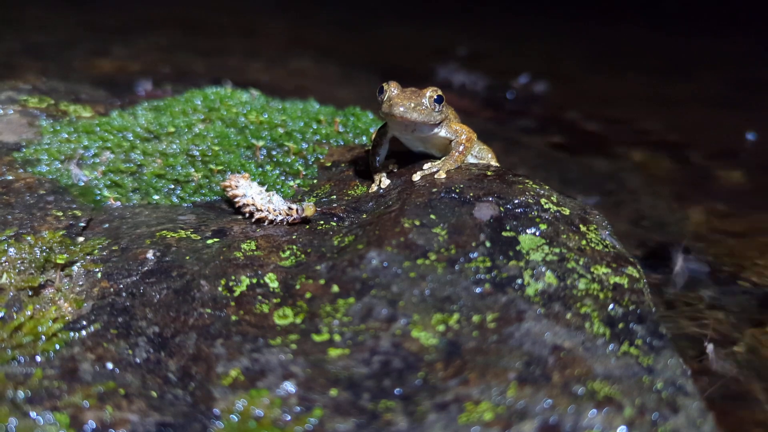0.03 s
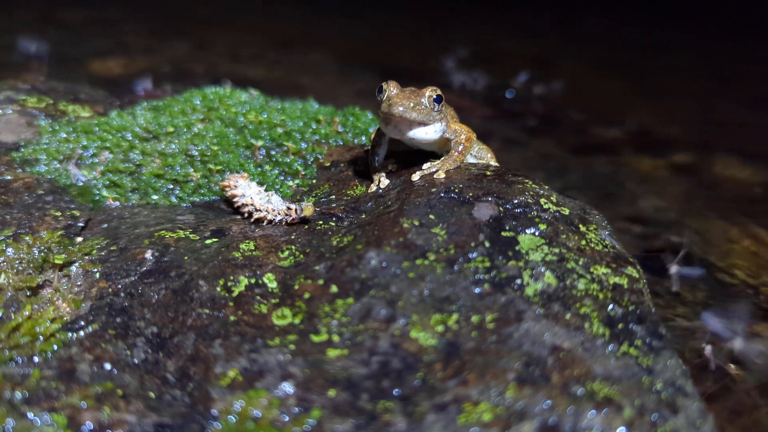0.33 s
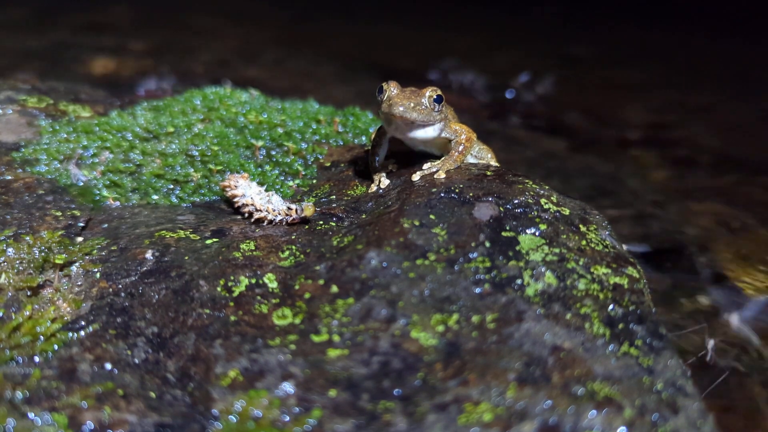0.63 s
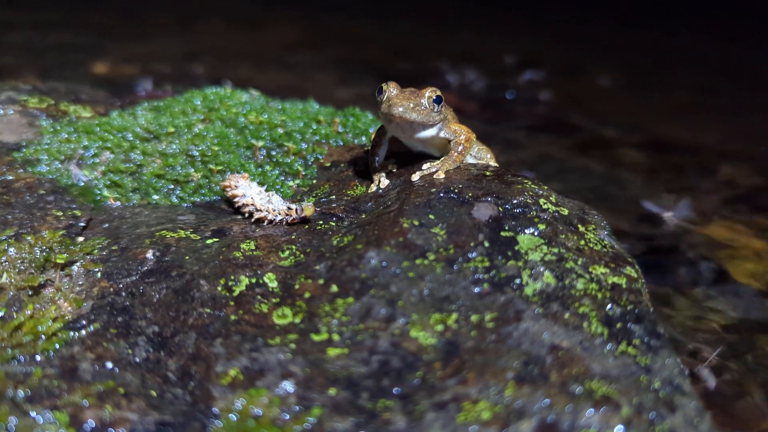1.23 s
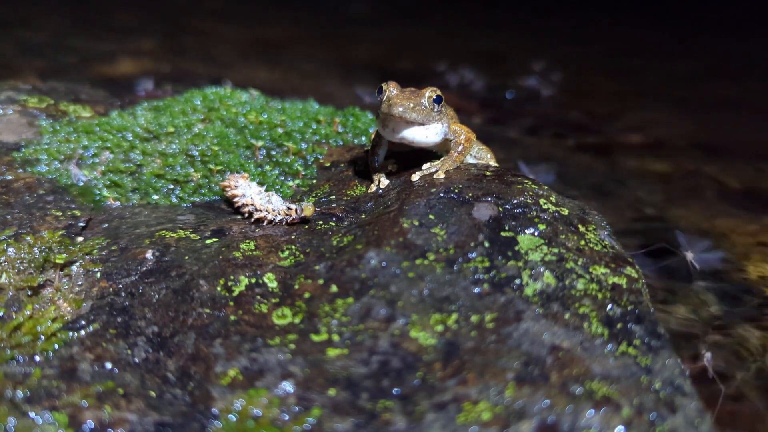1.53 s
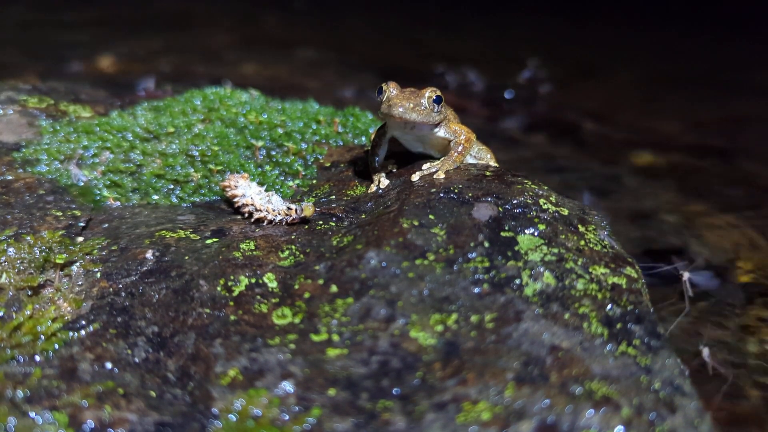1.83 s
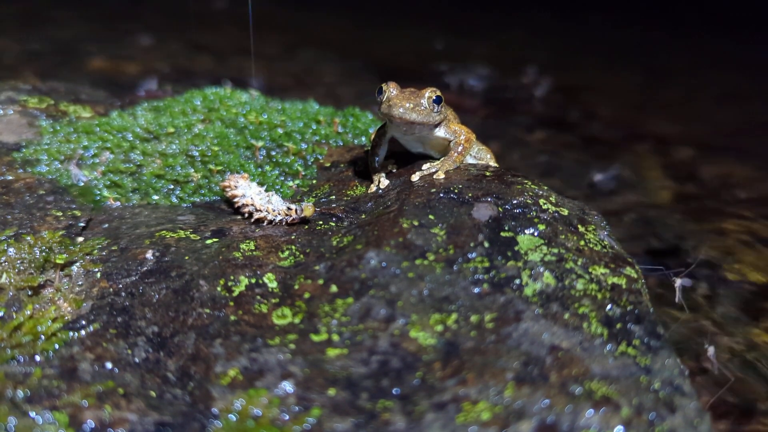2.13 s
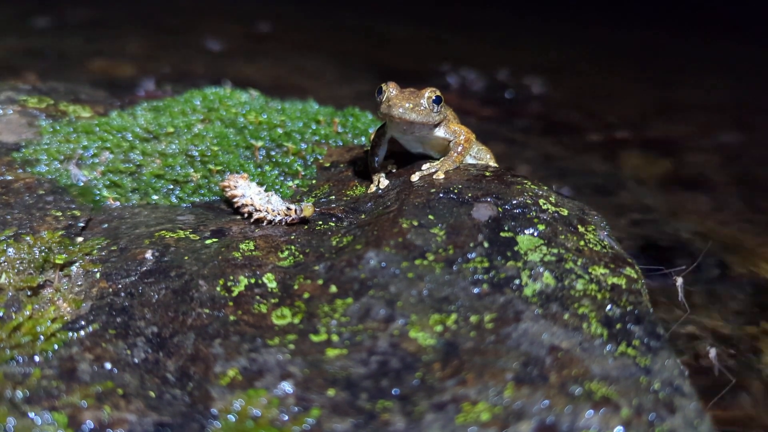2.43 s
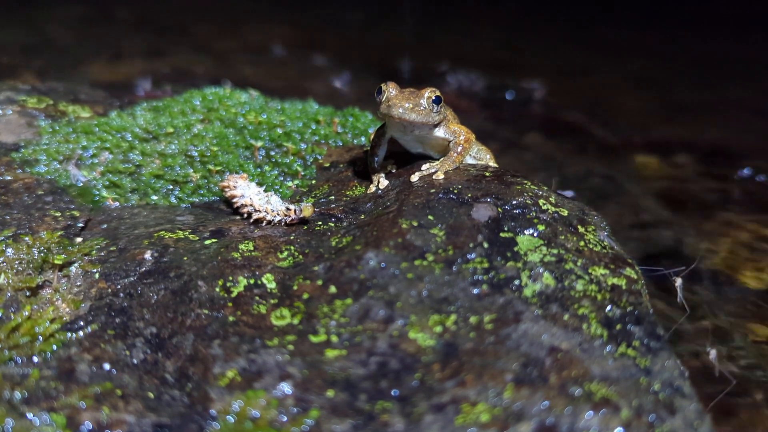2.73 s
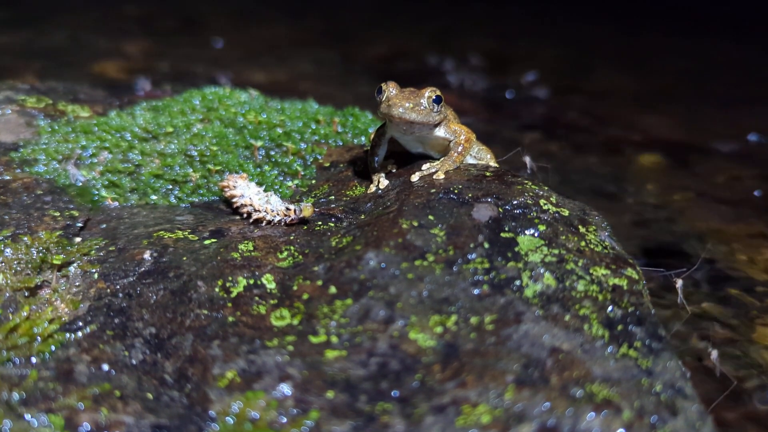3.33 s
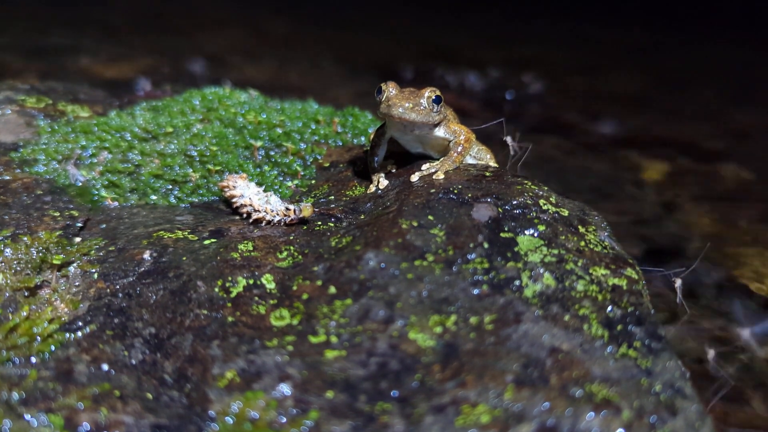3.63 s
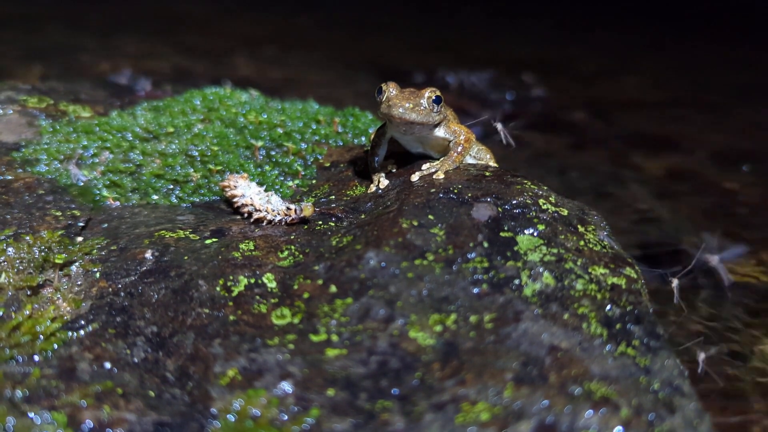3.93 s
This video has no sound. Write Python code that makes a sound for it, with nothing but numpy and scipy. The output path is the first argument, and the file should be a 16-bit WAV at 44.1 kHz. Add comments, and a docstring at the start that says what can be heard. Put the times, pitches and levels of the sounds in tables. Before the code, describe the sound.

Close by on the right, a frog whistles three times, each call a run of quick pulses that climb and swell. A night stream rushes and babbles throughout, with small plops and ticking droplets after the calls end.

```python
"""Beside a rushing stream at night, the microphone close to a rock where a small frog sits, to the right.
The frog gives three rising, trilled whistles, each a run of throat pulses that climb, swell and merge.
Behind it the water is a wash of far splashes, with ringing bubbles, a few near plops and ticking spray.
The recorder's limiter ducks the water under the loud end of each call."""
import sys
import numpy as np
from scipy import signal
from scipy.io import wavfile
from scipy.ndimage import uniform_filter1d, minimum_filter1d

SR = 44100
rng = np.random.default_rng(int(sys.argv[2]) if len(sys.argv) > 2 else 0)


def master_out(mix):
    """Clip the mix to full scale and print it as 16-bit PCM to the path in sys.argv[1]."""
    frames = np.transpose(np.atleast_2d(mix))
    ceiling = np.clip(frames, -1, 1)
    pcm = np.round(ceiling * 32767).astype(np.int16)
    wavfile.write(sys.argv[1], SR, pcm)


N = 176400
T = np.arange(N) / SR

# The stream's spectrum from the bank. Each row: frequency in Hz, relative level per Hz in dB.
WATER_SPECTRUM = [(18, -59), (30, -47), (53, -16), (97, -20.5), (177, -3.5), (202, -3.5), (270, -0.5),
                  (389, -7), (479, -2.5), (673, -4.5), (897, -0.5), (996, 1.5), (1330, -3), (1590, -7),
                  (2070, -0.5), (2490, -2.5), (2690, -7), (3230, -8.5), (4090, -14.5), (5590, -23.5),
                  (6210, -23), (8060, -19.5), (9940, -30), (11900, -24), (15500, -36.5)]
# Where each pitch of the water sits. Each row: frequency in Hz, left minus right in dB.
WATER_BALANCE = [(100, -0.2), (450, 0.7), (730, -2), (1000, 0), (1150, -4), (1370, 5), (1600, 3),
                 (1950, -14), (2450, -0.5), (3000, 3), (3600, 2), (4200, 0), (8000, 2), (13000, 2.5)]


def from_db(db):
    """Decibels to gain."""
    return 10 ** (np.asarray(db) / 20)


def unit_rms(x):
    """Scale to unit power."""
    return x / np.sqrt(np.mean(x ** 2) + 1e-20)


def in_time(rows):
    """Join rows of (seconds, value) into a curve over the scene."""
    return np.interp(T, *np.transpose(rows))


def at_hz(rows, hz):
    """Read rows of (Hz, value) on a log-frequency axis."""
    freqs, values = np.transpose(rows)
    return np.interp(np.log(hz), np.log(freqs), values)


def band(x, low_hz, high_hz):
    """Band-pass."""
    sos = signal.butter(2, [low_hz, min(high_hz, .45 * SR)], "band", fs=SR, output="sos")
    return signal.sosfilt(sos, x + 1e-18)


def drift(hz):
    """A random wander with spread 1, rolling off above hz."""
    pole = np.exp(-40 * np.pi * hz / SR)
    slow = signal.lfilter([1], [1, -2 * pole, pole * pole], rng.standard_normal(N // 20 + 4002))[4000:]
    return np.interp(np.arange(N) / 20, np.arange(len(slow)), unit_rms(slow))


def panned(db):
    """Left and right gains for a level difference."""
    return from_db([[db / 2], [-db / 2]])


def add(out, start_s, sound):
    """Mix a sound in at a time."""
    i = int(start_s * SR)
    out[..., i:i + sound.shape[-1]] += sound[..., :max(N - i, 0)]


def wash():
    """Countless far splashes: quarter-octave noise bands that flicker, partly together, mostly apart."""
    # How alike the two sides are. Each row: frequency in Hz, left-right correlation.
    likeness = [(60, 0.55), (110, 0.8), (200, 1), (380, 0.78), (700, 1), (1290, -0.17), (2380, 0.36),
                (4400, -0.16), (8120, 0.052), (15000, -0.074)]
    out, together = 0, drift(41)
    edges_hz = 30 * 2 ** np.arange(0, 9.3, .25)
    white = rng.standard_normal((2, 2, N))
    for k, (low, high) in enumerate(zip(edges_hz, edges_hz[1:])):
        mid, side = band(white[k % 2], low, high)
        hz = np.sqrt(low * high)
        alike = np.clip(at_hz(likeness, hz), -.5, .98)
        stereo = mid + np.sqrt((1 - alike) / (1 + alike)) * side * [[1], [-1]]
        flicker_db = 2.01 * (0.32 * together + drift(33.5))
        gain = from_db(at_hz(WATER_SPECTRUM, hz) + flicker_db)
        out = out + gain * panned(at_hz(WATER_BALANCE, hz)) * stereo
    return from_db(-27.5) * unit_rms(out)


def bubble(hz, cycles, lag_s):
    """A bubble rings for some cycles and rises in pitch; a positive lag reaches the left side later."""
    t60 = cycles / hz
    delays = np.array([[max(lag_s, 0)], [max(-lag_s, 0)]])
    t = np.maximum(T[:int(t60 * SR) + 40] - delays, 0)
    ring = np.sin(2 * np.pi * hz * t * (1 + 0.1 * t / t60))
    envelope = from_db(-60 * t / t60) * (1 - np.exp(-t * hz))
    return ring * envelope * panned(at_hz(WATER_BALANCE, hz))


def babble(per_s=420, low_hz=400, high_hz=4500):
    """Bubbles of many sizes burst at random across the stream."""
    out = np.zeros((2, N))
    for when, pitch, size, length, place in rng.random((int(per_s * N / SR), 5)):
        hz = low_hz * (high_hz / low_hz) ** pitch
        size_db = 2.5 * min(-np.log(1 - size), 3.6)
        db = at_hz(WATER_SPECTRUM, hz) + 10 * np.log10(hz) + size_db
        ring = bubble(hz, cycles=37.5 * (.5 + 1.1 * length), lag_s=0.00048 * (2 * place - 1))
        add(out, when * N / SR, from_db(db) * ring)
    return from_db(-34.5) * unit_rms(out)


def spray(per_s=220, tick_s=0.00099, drop_decay_s=0.0064):
    """Fine droplets tick all the time; a few larger drops hit the rock."""
    # Drops on the rock. Each row: start in seconds, relative level in dB.
    drops = [(1.3494, -32), (2.4627, -26), (2.587, -23), (2.7876, -27), (3.1058, -35), (3.3243, -25),
             (3.9629, -23.5)]
    sizes = from_db(4.5 * np.minimum(rng.exponential(1, N), 4.5))
    landings = sizes * (rng.random(N) < per_s / SR)
    ticks = signal.lfilter([1], [1, -np.exp(-1 / (tick_s * SR))], landings + 1e-18)
    fine = from_db(-52) * unit_rms(band(ticks * rng.standard_normal((2, N)), 2400, 10200))
    hits = np.zeros((2, N))
    for start_s, db in drops:
        add(hits, start_s, from_db(db - 10) * np.exp(-T[:SR // 20] / drop_decay_s))
    return fine + hits * unit_rms(band(rng.standard_normal((2, N)), 4400, 13000))


def plops():
    """A few large bubbles burst near the rock, and a few short, high splashes land close by."""
    # Each row: start in seconds, level in dB before panning, starting pitch in Hz, cycles of ring.
    near_plops = [(1.788, -18.5, 950, 77), (1.865, -15, 2220, 52), (2.157, -15, 1044, 31),
                  (2.227, -18, 2340, 46), (2.078, -24, 4900, 25), (2.68, -13.5, 2410, 35),
                  (2.962, -18.5, 1020, 61), (2.996, -20, 4600, 23), (3.042, -3.5, 2440, 17.4),
                  (3.752, -24, 4400, 25), (3.774, -18, 1010, 53), (3.906, -11, 2050, 25)]
    out = np.zeros((2, N))
    for start_s, db, hz, cycles in near_plops:
        add(out, start_s, from_db(db) * bubble(hz, cycles, lag_s=0))
    return out


def throat_pulses(first_s, last_s, count, attack_s=0.003, release_s=0.0059, catch_width_s=0.0018):
    """Envelopes of the throat's slightly quickening pulses and of the rough catch just before each."""
    progress = np.linspace(0, 1, count)
    times = first_s + (last_s - first_s) * (progress + .052 * progress * (1 - progress))
    pulse, catch = np.zeros((2, N))
    t = np.arange(-SR // 50, SR // 50) / SR
    for peak_s, late, (stretch, force, early) in zip(times, progress, rng.standard_normal((count, 3))):
        half_width_s = np.where(t < 0, attack_s, release_s * np.exp(.08 * stretch))
        half_width_s *= 1 - 0.27 * late ** 3
        add(pulse, peak_s + t[0], np.exp(-np.abs(t / half_width_s) ** 2.1))
        lead_s = 0.0061 * np.exp(0.11 * early) * (1 + 0.52 * late ** 3)
        strength = (1 - 0.27 * late ** 4) * from_db(1.66 * force)
        add(catch, peak_s + t[0], strength * np.exp(-((t + lead_s) / catch_width_s) ** 2))
    return pulse, catch


def call(first_s, last_s, steepness, effort, count):
    """One call: throat pulses merge on a rising tone. Returns the whistle and its faint upper tones."""
    start_hz, rise_hz, climb_hz = 1649.7, 111.5, 255
    sag_hz, catch_lift_hz, jitter_hz = 140.4, 145, 20.8
    shimmer_db, stop_s = 1.55, 0.014
    pulse, catch = throat_pulses(first_s, last_s, count)
    along = np.clip((T - first_s) / (last_s - first_s), 0, 1)
    merged = along ** steepness
    # Late in the call the tone carries on between pulses, sagging in pitch there.
    stop = np.exp(-(np.maximum(T - last_s, 0) / stop_s) ** 2)
    sustain = 0.16 * np.sqrt(merged) * (1 - pulse) * stop
    hz = start_hz + rise_hz * along + climb_hz * merged - sag_hz * merged * (1 - pulse)
    hz += (1 - 0.85 * merged) * (catch_lift_hz * catch + jitter_hz * drift(242))
    phase = 2 * np.pi * np.cumsum(hz) / SR
    rough = 0.27 * catch + sustain * from_db(2.1 * drift(87))
    shimmer = from_db(shimmer_db * (1 - merged) * drift(170))
    tone = (pulse * shimmer + rough) * np.sin(phase)
    rasp = from_db(-13) * rough * (1 - merged) * unit_rms(band(rng.standard_normal(N), 2250, 2610))
    # While the pulses are half merged, a tone a fifth higher breaks in between them.
    half_merged = 4 * merged * (1 - merged)
    fifth = from_db(-21) * rough * half_merged * np.sin(1.5 * phase + .5 * drift(100))
    octave = from_db(-35.5) * (pulse + 2 * rough) * merged * np.sin(2 * phase + .4 * drift(150))
    return from_db(in_time(effort)) * np.array([tone + rasp, fifth + octave])


def frog(left_db=-10, right_db=-1.5, right_lag_s=.00032, echo_t60_s=0.3):
    """The close whistle is louder on the right, its upper tones even; rocks scatter a faint echo."""
    # Each row: a call's first and last pulse in seconds, steepness of its final pitch climb.
    calls = [(0.190, 0.63, 5.5), (0.864, 1.213, 6.5), (1.458, 1.685, 3.07)]
    # The frog's effort, one curve a call. Each row: time in seconds, relative level in dB.
    efforts = [
        [(.19, -7), (.24, -3), (.275, 1), (.36, 3), (.42, -3), (.53, -2), (.57, 5.5), (.612, 9), (.635, 5)],
        [(.866, -7), (.9, -7.5), (.96, 1), (1.01, -0.5), (1.06, 0), (1.13, 2.5), (1.175, 8.5), (1.215, 7.5)],
        [(1.459, -7.5), (1.484, -9.5), (1.504, 1.5), (1.55, 4), (1.6, 7), (1.645, 11.5), (1.686, 8.5)],
    ]
    # The number of throat pulses in each call.
    counts = (20, 16, 11)
    whistle, upper = sum(call(*row, effort, n) for row, effort, n in zip(calls, efforts, counts))
    left = from_db(left_db) * whistle + upper
    right = np.interp(T - right_lag_s, T, from_db(right_db) * whistle + upper)
    t = T[:SR // 5]
    scatter = rng.standard_normal((2, len(t))) * from_db(-60 * t / echo_t60_s)
    scatter /= np.sqrt(np.sum(scatter ** 2, axis=1, keepdims=True))
    echo = signal.fftconvolve(whistle[None], scatter, axes=1)[:, :N]
    return np.array([left, right]) + from_db(-38.5) * echo


def scene():
    """The frog close to the microphone, the stream slowly swelling behind it."""
    # The stream's flow. Each row: time in seconds, gain in dB.
    flow = [(.12, -2), (.5, -3.5), (1.0, -1), (1.8, -0.5), (2.5, 0), (3.1, 1.5), (4.0, 1)]
    return frog() + from_db(in_time(flow)) * (wash() + babble()) + plops() + spray()


def record(dry):
    """A fast limiter turns both sides down together; the sound fades in and the top is cut."""
    ceiling, recovery_db_per_s, lookahead_s = .95, 174, .005
    open_s, fade_s, cutoff_hz = 0.11, 0.0085, 15800
    over_db = np.maximum(20 * np.log10(np.abs(dry).max(axis=0) / ceiling + 1e-9), 0)
    recovery_db = recovery_db_per_s * T
    duck_db = np.maximum.accumulate(over_db + recovery_db) - recovery_db
    window = int(lookahead_s * SR) + 1
    gain = from_db(uniform_filter1d(minimum_filter1d(-duck_db, window), window))
    fade_in = np.clip((T - open_s) / fade_s, 0, 1)
    notch = signal.iirnotch(4070, Q=75, fs=SR)  # a narrow dip in the microphone's response
    coloured = signal.lfilter(*notch, dry * gain * fade_in)
    return signal.sosfilt(signal.ellip(12, .1, 90, cutoff_hz, fs=SR, output="sos"), coloured)


dry = scene()
out = record(dry)
master_out(out)
```